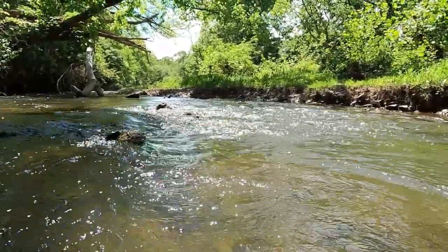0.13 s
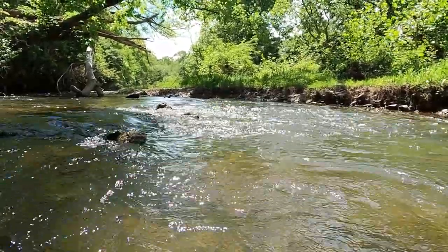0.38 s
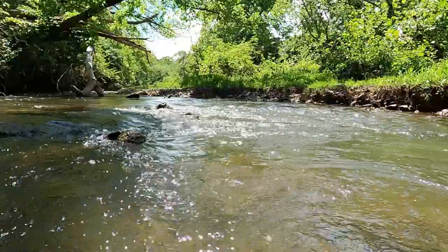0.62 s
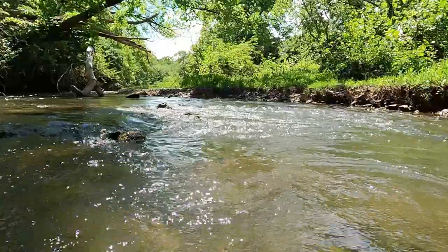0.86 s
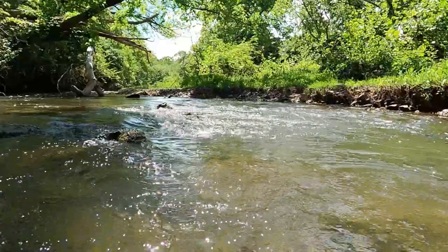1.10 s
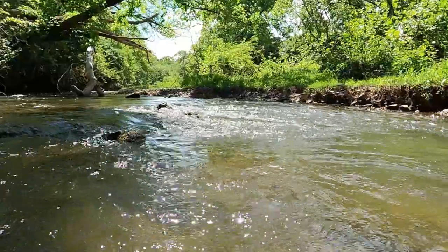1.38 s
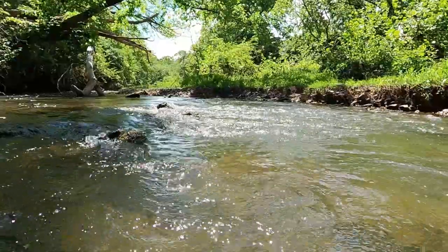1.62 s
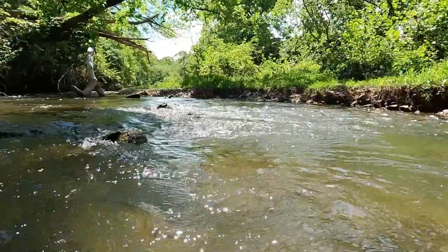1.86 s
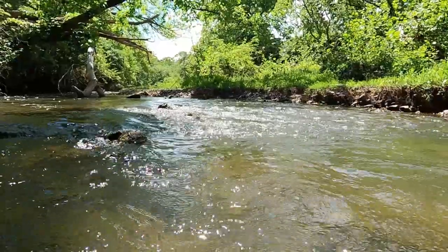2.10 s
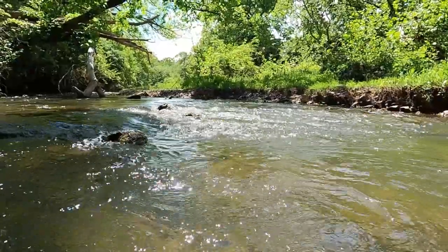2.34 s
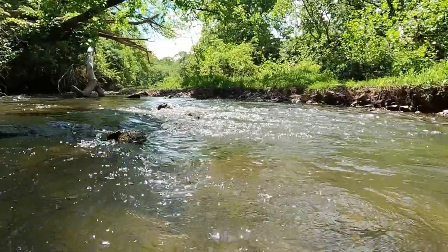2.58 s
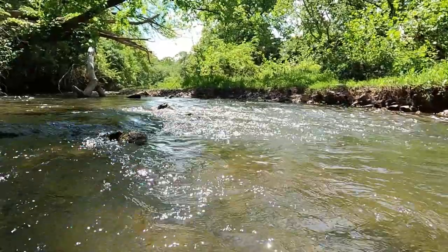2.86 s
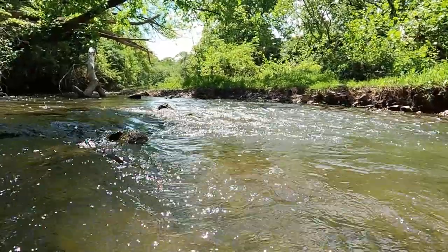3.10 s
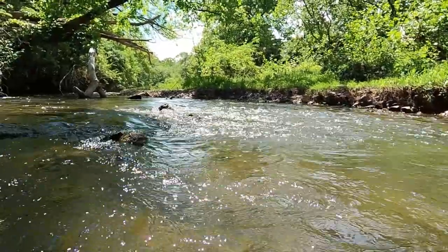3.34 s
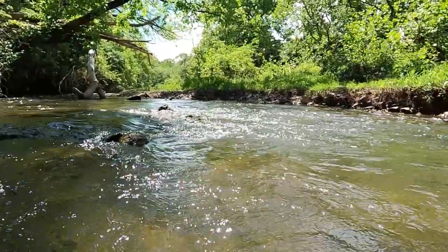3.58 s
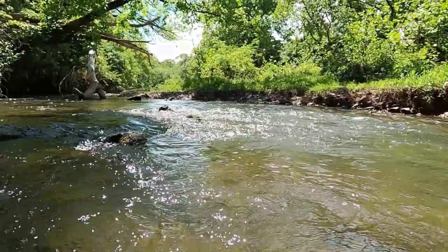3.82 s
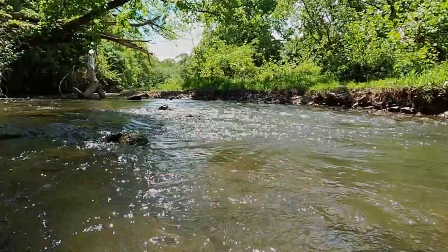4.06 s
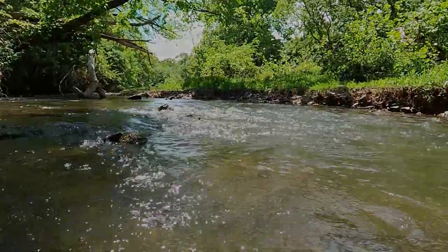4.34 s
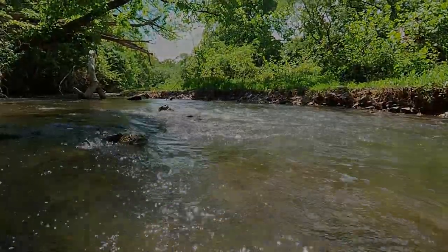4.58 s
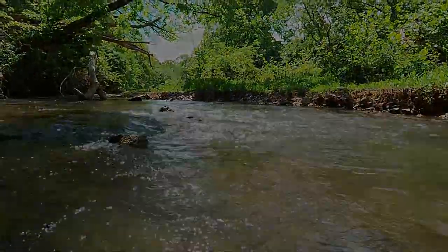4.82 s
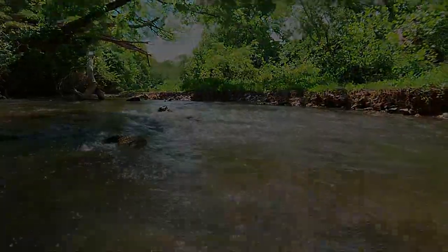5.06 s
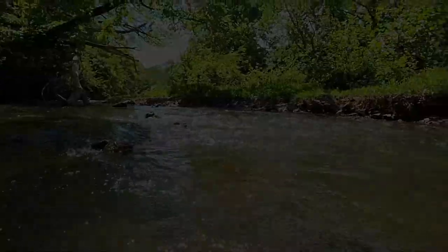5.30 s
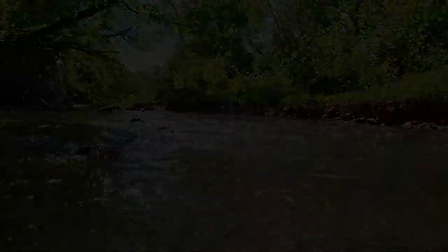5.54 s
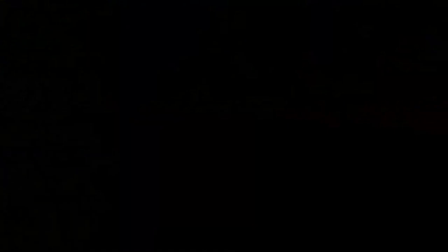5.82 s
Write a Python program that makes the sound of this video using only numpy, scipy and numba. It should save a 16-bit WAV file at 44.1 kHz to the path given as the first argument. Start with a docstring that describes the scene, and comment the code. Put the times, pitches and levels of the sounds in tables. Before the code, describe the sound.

A shallow creek babbles over stones from the start, a dense crowd of short bubble tones with distinct plops and fine spray ticks. A gurgle comes early, a low engine-like drone slides upward around one second, and a faint hum follows. Soft water hiss, rumble and light breeze lie beneath. A small stereo microphone sits outdoors a few metres away, just above the water. The sound fades from about four seconds, then cuts off.

```python
"""Water babbling over stones comes first: a crowd of short bubble tones with single plops and gurgles on top.
Each bubble in this shallow creek is a sine grain that swells and dies in a few cycles; spray is treble ticks,
and farther water is a hiss of coloured noise. Below lie a noise rumble, a sliding sine drone, a faint hum of
three partials and breeze in low noise puffs. A small two-port microphone hears it a few metres from the stones,
just above the water. The sound is faded down and cut off at the end."""
import sys
import numpy as np
from scipy import signal
from scipy.fft import rfft, irfft
from scipy.io import wavfile
from scipy.ndimage import uniform_filter1d
from numba import njit

SR = 44100
rng = np.random.default_rng(int(sys.argv[2]) if len(sys.argv) > 2 else 0)


def gain_from_db(level_db):
    """Convert decibel levels to linear amplitude factors (20 dB per decade)."""
    decades = np.asarray(level_db, float) / 20
    return 10 ** decades


def transcribe(signal):
    """Save signal, clipped to [-1, 1], as a 16-bit WAV file at the path in sys.argv[1]."""
    frames = np.atleast_2d(signal).T
    limited = np.clip(frames, -1, 1)
    pcm = np.round(limited * 32767).astype(np.int16)
    wavfile.write(sys.argv[1], SR, pcm)


N = 261072
CUT_S = 5.496  # the water events and the sound end here

# nearest bubbles, before housing and fade: loudest moment t/s, pitch f/Hz, peak level/dB, half-height length/cycles
CLEAR_BUBBLES = [(0.2302, 3340, -32, 12.1), (0.2474, 7190, -34.5, 4.3), (2.945, 540, -30, 4),
                 (3.014, 570, -30, 6), (2.91, 1800, -29, 6), (4.453, 1310, -36, 10), (4.473, 1330, -40, 9),
                 (4.622, 1340, -31, 9), (0.4846, 2810, -29, 6.2), (0.55, 1310, -29.5, 10.6),
                 (0.774, 4600, -34.5, 4.2), (0.789, 1590, -26.5, 4.2), (0.833, 357, -31, 6),
                 (0.849, 2050, -34.5, 14), (0.8597, 2790, -30, 6.5), (1.0695, 4550, -29.5, 3.7),
                 (1.063, 3340, -31.5, 6), (1.276, 1950, -29.5, 5), (1.1808, 3120, -27.5, 5.2),
                 (1.2253, 5550, -30.5, 2.9), (1.281, 2800, -25, 2.2), (1.305, 860, -27.5, 5.0),
                 (1.5542, 600, -27.5, 5.3), (1.6294, 570, -30, 7.0), (1.6344, 3080, -26, 4.1),
                 (1.7863, 2600, -27.5, 4.4), (1.8148, 1380, -23.5, 4.5), (1.9855, 2160, -25.5, 4.9),
                 (2.048, 455, -29, 8.5), (2.1422, 3350, -34.5, 27), (2.1527, 2540, -25, 5.1),
                 (2.1944, 4080, -32.5, 7.9), (2.2385, 1273, -24.5, 17), (2.2971, 2300, -25.5, 5.2),
                 (2.392, 820, -31, 9.0), (2.4038, 2170, -23.5, 3.1), (2.5762, 2600, -30, 7.5),
                 (2.6912, 3370, -27, 5.1), (2.9183, 840, -24, 4), (3.0115, 720, -25, 4.6),
                 (3.012, 2360, -21.5, 2.1), (3.0388, 3180, -28, 2.8), (3.0392, 2450, -23.5, 5.6),
                 (3.0806, 3470, -32, 6.3), (3.1305, 5950, -34.5, 7.3), (3.1474, 1320, -26.5, 5.8),
                 (3.1839, 3030, -22, 4.3), (3.2295, 2320, -24, 3.1), (3.4136, 746, -27, 7),
                 (3.6854, 2560, -30, 7.6), (3.805, 1350, -31, 11.6), (3.8858, 2840, -29.5, 6.7),
                 (3.9386, 1210, -32.5, 5.9), (3.9664, 380, -32, 9.9), (4.097, 1930, -30, 12),
                 (4.083, 1700, -31.5, 9), (4.097, 900, -28, 4.5), (4.1125, 1990, -27, 7.2),
                 (4.3043, 3590, -34.5, 10), (4.319, 6090, -35, 5.5), (4.423, 430, -27.5, 4.4),
                 (4.5362, 3290, -31, 4.9), (4.6374, 980, -27.5, 8.8), (5.0065, 2990, -27, 2.7),
                 (5.2092, 2350, -22.5, 5.7), (0.1474, 2490, -36, 12), (0.1689, 4440, -38, 8),
                 (0.2582, 2490, -30, 7), (0.2751, 740, -28.5, 4.5), (0.6218, 3960, -35, 5),
                 (0.6453, 1180, -33, 11), (0.6947, 4440, -39, 6), (0.7363, 660, -31, 5),
                 (0.8344, 1320, -31.5, 5), (0.8408, 620, -37, 5), (0.9321, 6900, -38.5, 6),
                 (1.0384, 1400, -30, 6), (1.0788, 900, -34, 12), (1.311, 1050, -26, 5.5),
                 (1.58, 600, -31, 9), (1.605, 640, -41, 7), (1.6592, 2300, -31.5, 6), (1.801, 1980, -27, 5),
                 (1.869, 5500, -34, 4.5), (2.0286, 930, -30, 8.5), (2.1633, 3740, -33, 6),
                 (2.4367, 2350, -26.5, 4.5), (2.4751, 3530, -36.5, 11), (2.502, 1870, -31, 4.5),
                 (2.5526, 4200, -36, 5.5), (2.7737, 5800, -38, 7), (2.9004, 1400, -29, 6),
                 (2.9383, 3530, -36, 7.5), (3.1638, 1700, -29.5, 5.5), (3.255, 990, -32, 5),
                 (3.4827, 5100, -35, 6), (3.512, 6900, -42, 6), (3.5512, 880, -35, 5),
                 (3.8475, 5200, -37.5, 8.5), (3.9253, 6660, -39, 6), (3.9292, 1250, -25.5, 5.5),
                 (3.9393, 2220, -33, 10), (4.0835, 2220, -37, 6), (4.1156, 2800, -29.5, 9),
                 (4.4025, 1700, -31, 5), (4.412, 559.1, -33, 5), (4.5495, 930, -34, 16),
                 (4.6898, 2150, -29, 9), (4.8056, 2700, -32, 10), (4.844, 3400, -33, 6),
                 (4.8759, 2220, -27, 4.5), (4.9201, 4440, -38, 9), (5.0066, 1900, -31, 11),
                 (5.0203, 440, -30, 6.5), (5.1493, 1200, -33, 5.5), (5.1757, 2220, -30, 8),
                 (5.1875, 1300, -29, 5.5), (3.4383, 1110, -31, 6), (3.4716, 2010, -32, 6),
                 (3.526, 614, -34.5, 5), (3.5375, 700, -30.5, 5), (3.5405, 1250, -36, 6),
                 (3.5619, 640, -29, 6), (0.753, 1180, -31, 6), (1.009, 580, -31, 8), (1.026, 2230, -30, 6),
                 (1.092, 596, -43, 5), (2.815, 980, -32.5, 7), (2.834, 3600, -39, 8),
                 (3.38, 2700, -33, 5.5), (3.4068, 3960, -34, 5), (3.474, 610, -28, 3.6),
                 (3.574, 1550, -31.5, 8), (3.6444, 4580, -37.5, 7.4), (4.254, 5350, -42, 9),
                 (1.1731, 5290, -36, 6.5), (3.257, 4440, -40, 8)]
# larger pockets, before housing and fade: loudest moment t/s, pitch f/Hz, peak level/dB, half-height length/cycles,
# pitch rise over that length/fraction
GURGLE_POCKETS = [(0.416, 630, -31.5, 9, 0.3), (0.422, 1210, -39, 10, .1), (0.45, 620, -29.5, 7, .2),
                  (0.455, 1080, -27, 11, 0.23), (0.468, 770, -31.5, 12, 0), (0.469, 1230, -32, 12, 0.2),
                  (2.983, 442, -36, 9, .2), (2.99, 740, -35, 13, 0.02), (2.998, 1290, -32.5, 18, 0.06),
                  (3.041, 1340, -34, 25, 0), (4.183, 614, -34.5, 16, 0)]
# nearest droplets: a millisecond before the loudest moment t/s, base level/dB for the tick's tones
SPRAY_TICKS = [(0.172, -45), (0.2468, -47), (0.7497, -44), (0.841, -41), (1.2007, -46), (1.3328, -39.5),
               (1.387, -40.5), (1.4384, -35), (3.2445, -43), (3.7429, -42.5), (4.342, -43), (4.646, -39),
               (0.8074, -46), (1.2237, -49), (1.2471, -49.5), (1.2933, -45), (1.4459, -50.5), (2.7463, -45),
               (3.2178, -45), (3.4042, -45), (4.3088, -45), (4.479, -47.5), (4.9495, -44), (1.62, -49),
               (1.7175, -52.5), (1.803, -46.5), (1.846, -50), (2.033, -48), (5.3184, -46), (5.3428, -42)]
# tones inside one tick: f/Hz, added level/dB, half-height length/cycles
TICK_TONES = [(7000, 1.5, 2.5), (10500, -1, 3.0), (13000, -14.5, 4.0)]
# spectral shape of the water, relative per Hz: f/Hz, level/dB
WATER_COLOUR = [(150, -26), (250, -5), (418, -5), (568, -1.5), (735, -1.5), (843, -2), (1290, -2.5),
                (1510, -5), (2200, -6), (3490, -16.5), (5080, -20.5), (7530, -27), (8340, -31),
                (12200, -43.5), (14900, -54)]
# spectral shape of the outdoor rumble, relative per Hz: f/Hz, level/dB
RUMBLE_COLOUR = [(8.8, -34.5), (15, -9), (24, 7.5), (40, 1), (62, 2), (76, -2), (90, -5.5), (113, -5),
                 (212, -7), (252, -15), (350, -23), (460, -38), (770, -120)]
# surges of the current: t/s, added level/dB
CURRENT_SURGES = [(0, 1.5), (.3, 2), (.62, 0.5), (.8, 4.5), (.95, 1), (1.08, 2), (1.25, 0.5), (1.7, 1),
                  (1.95, 1), (2.2, 2), (2.6, 1.5), (3, 2), (3.3, 1.5), (3.55, 1.5), (3.75, 2.5), (3.9, 2),
                  (4.02, 1.5), (4.11, 2.5), (4.25, 0.5), (4.45, 1), (4.6, 3), (4.8, 2), (5.05, 3.5),
                  (5.5, 5)]
# swells of the rumble: t/s, added level/dB
RUMBLE_SWELLS = [(0, -2), (.25, -3), (.45, -0.5), (.85, -1.5), (1.05, 0.5), (1.4, -2), (1.6, -1.5),
                 (2, -2.5), (2.4, -1.5), (2.9, -1.5), (3.2, 0), (3.6, -2), (4, -3.5), (4.3, 2), (4.7, -0.5),
                 (4.9, 1.5), (5.5, 1)]
# partials of the hum before wavering: f/Hz, relative level/dB
HUM_TONES = [(88.5, -1), (133, -5), (176, -8.5)]
# how the two ports differ: f/Hz, left minus right level/dB, lag of left/rad, unrelated share/0-1
PORT_DIFFERENCES = [(40, .6, 0, .06), (250, .2, .08, .07), (500, 1, .31, .11), (800, -.7, .73, .19),
                    (1000, -3.4, .58, .31), (1300, -1.9, .08, .23), (1600, -.3, .06, .23),
                    (2000, 2.3, .32, .27), (2600, 2.1, .71, .24), (3300, .6, .67, .27),
                    (5100, .5, .33, .42), (6500, 1.8, .11, .48), (8100, 3.8, .31, .55), (10000, 0, 0, .35),
                    (13000, -.3, 0, .65)]
# colour of the microphone in its housing: f/Hz, level/dB
HOUSING_COLOUR = [(2500, 0), (3000, 1.5), (3450, 3.5), (3750, 2.5), (4450, 2), (5000, -1), (6500, -0.5),
                  (7300, 2.5), (7850, 2.5), (8050, -2), (9000, 0.5), (12400, 0), (12800, 3), (13300, -1),
                  (14300, -4.5)]


def curve(table, column=1):
    """Reads a table column at every sample, on straight lines through time."""
    rows = np.array(table, float)
    return np.interp(np.arange(N) / SR, rows[:, 0], rows[:, column])


def at(table, hz, column=1):
    """Reads a table column on a log-frequency axis."""
    rows = np.array(table, float)
    return np.interp(np.log(hz + 1), np.log(rows[:, 0] + 1), rows[:, column])


def level(x, db):
    """Scales to an rms level in dB."""
    return x * gain_from_db(db) / np.sqrt(np.mean(x ** 2))


def walk(rate_hz):
    """Random levels held 1 / rate_hz seconds and slewed twice; spread 1."""
    hold = int(SR / rate_hz)
    steps = np.repeat(rng.standard_normal(N // hold + 1), hold)
    smooth = uniform_filter1d(uniform_filter1d(steps, hold), hold)[:N]
    return smooth / smooth.std()


def gate(from_s, to_s, edge_s):
    """Rises, holds and falls, with equal straight edges."""
    t = np.arange(N) / SR
    return np.clip(np.minimum(t - from_s, to_s - t) / edge_s, 0, 1)


def ports(hz):
    """Level difference, lag and unrelated share of the two ports, each set by pitch."""
    return (at(PORT_DIFFERENCES, hz, column=k) for k in (1, 2, 3))


def wash(spectrum):
    """Coloured noise at both ports, partly shared, at 0 dB rms."""
    hz = np.fft.rfftfreq(N, 1 / SR)
    mid, other = rfft(rng.standard_normal((2, N)))
    pan_db, lag, share = ports(hz)
    side = gain_from_db(pan_db / 2) * np.exp(-.5j * lag)
    pair = np.array([(mid + share * other) * side, (mid - share * other) / side])
    return level(irfft(gain_from_db(at(spectrum, hz)) * pair, N), 0)


@njit
def ring(peak, turn, tau, glide, left, right):
    """Each grain swells and dies as u^2 exp(-u), loudest at u = 2, while its pitch glides."""
    out = np.zeros((2, N))
    for k in range(len(peak)):
        start = int(peak[k] - 2 * tau[k])
        fall = np.exp(-1 / tau[k])
        z = 1 + 0j
        step = fall * np.exp(1j * turn[k] * (1 - 2 * glide[k]))
        bend = np.exp(1j * turn[k] * glide[k] / tau[k])
        for i in range(int(11 * tau[k])):
            z, step = z * step, step * bend
            if 0 <= start + i < N:
                swell = (i / tau[k]) ** 2
                out[0, start + i] += swell * (z * left[k]).real
                out[1, start + i] += swell * (z * right[k]).real
    return out


def bubbles(s, hz, db, cycles, pan_db, lag, glide):
    """Short tones; cycles is the width at half height, glide the fractional pitch rise over it."""
    widths = 3.4  # half-height width of u^2 exp(-u)
    phase = np.exp(2j * np.pi * rng.random(len(s)))
    size = gain_from_db(db) * np.exp(2) / 4 * phase  # the grain's own peak is 4 exp(-2)
    side = gain_from_db(pan_db / 2) * np.exp(-.5j * lag)
    turn, tau = 2 * np.pi * hz / SR, cycles / widths * SR / hz
    return ring(s * SR, turn, tau, glide / widths, size * side, size / side)


def breeze():
    """Light air buffets each port on its own: low noise in puffs, mostly between 15 and 55 Hz."""
    low = signal.butter(3, 55, fs=SR, output="sos")
    high = signal.butter(2, 15, "high", fs=SR, output="sos")
    puff_db = 4 * np.array([walk(11.0), walk(3.3)])
    puffs = signal.sosfilt(low, rng.standard_normal((2, N))) * gain_from_db(puff_db)
    return level(signal.sosfilt(high, puffs), -53.5)


def rumble():
    """Low outdoor noise that swells apart from the water, wavering a little."""
    loud_db = -34.0 + curve(RUMBLE_SWELLS) + 0.47 * walk(7.3)
    return gain_from_db(loud_db) * wash(RUMBLE_COLOUR)


def hum():
    """Partials of a distant motor running level, wavering together in pitch and apart in level."""
    from_s, to_s, edge_s = 1.45, 3.93, 0.032
    base_db, waver_db = -44.5, 4.3
    waver = 1 + 0.012 * walk(7)
    tones = 0
    for hz, db in HUM_TONES:
        tone = np.sin(2 * np.pi * np.cumsum(hz * waver) / SR)
        tones = tones + gain_from_db(db + waver_db * walk(6.6)) * tone
    return np.sqrt(2) * gain_from_db(base_db) * gate(from_s, to_s, edge_s) * tones


def drone():
    """A low sine slides up and grows, fluttering a little, then stops, like a far engine gathering speed."""
    from_s, to_s, edge_s = .9, 1.5, .1
    start_hz, rise_hz_per_s = 37.5, 52
    start_db, grow_db_per_s = -35, 3  # rms, before flutter and edges
    since_s = np.arange(N) / SR - from_s
    hz = start_hz + rise_hz_per_s * since_s + .6 * walk(12)
    loud_db = start_db + grow_db_per_s * since_s + .8 * walk(15)
    loud = gain_from_db(loud_db) * gate(from_s, to_s, edge_s)
    return np.sqrt(2) * loud * np.sin(2 * np.pi * np.cumsum(hz) / SR)


def far_water():
    """Farther water blurs to a hiss: water-coloured noise with a slight flicker in level."""
    return gain_from_db(-41.5 + .9 * walk(20)) * wash(WATER_COLOUR)


def spray(count, faint_db, scatter_db):
    """Droplets bursting: few-cycle treble tones that peak together, some placed and many faint at random."""
    s, db = np.array(SPRAY_TICKS, float).T
    u = rng.random((count, 2)).T
    s = np.append(s, u[0] * CUT_S)
    db = np.append(db, faint_db + scatter_db * u[1])
    one, rise_s = np.ones(len(s)), .001
    pan_db = 5.5  # left minus right
    ticks = 0
    for hz, part_db, cycles in TICK_TONES:
        ticks = ticks + bubbles(s + rise_s, hz * one, db + part_db, cycles * one, pan_db * one, 0 * one, 0 * one)
    return ticks


def riffle(count, scatter_db, cap_db, clump_db, cycles, glide, db):
    """A crowd of bubbles of all sizes, small ones more often; pockets of air break up in clumps."""
    u, g = rng.random((count, 3)).T, rng.standard_normal((count, 4)).T
    small = .67  # under 1 favours small, high bubbles
    s, hz = u[0] * CUT_S, 230 * gain_from_db(36 * u[1] ** small)
    quick = walk(40)
    # slower surges belong to the current
    clump = (quick - uniform_filter1d(quick, int(.12 * SR)))[(s * SR).astype(int)]
    # small bubbles ring for more cycles
    length = cycles * (hz / 1000) ** .25 * gain_from_db(3 * g[0])
    # most are faint, a few are near; none is nearer than the closest stones
    cap_db = cap_db / (1 + (hz / 9500) ** 2)  # the smallest bubbles never stand out
    near_db = cap_db * np.tanh((clump_db * clump - scatter_db * np.log(u[2])) / cap_db)
    # the uneven spread of sizes is balanced so that the crowd keeps the water's colour
    crowding_db = 10 * (1 / small - 1) * np.log10(u[1] + 0.022)
    colour_db = at(WATER_COLOUR, hz) + 20 * np.log10(hz / 1000)
    size_db = colour_db - 10 * np.log10(length) - crowding_db + near_db
    # each bubble has its own place across the stream
    pan_db, lag, share = ports(hz)
    pan_db, lag = pan_db + 11 * share * g[1], lag + 1.5 * share * g[2]
    return level(bubbles(s, hz, size_db, length, pan_db, lag, glide * (1 + g[3])), db)


def gurgles():
    """Larger pockets in mid-riffle ring longer; most rise in pitch as they near the surface."""
    s, hz, db, cycles, rise = np.array(GURGLE_POCKETS, float).T
    pan_db, lag, _ = ports(hz)
    return bubbles(s, hz, db, cycles, pan_db, lag, rise)


def clear_bubbles():
    """The nearest bubbles stand out singly from the middle of the riffle, each rising slightly in pitch."""
    s, hz, db, cycles = np.array(CLEAR_BUBBLES, float).T
    pan_db, lag, _ = ports(hz)
    return bubbles(s, hz, db, cycles, pan_db, lag, np.full(len(s), .04))


def scene():
    """The bubble crowd and far hiss surge with the current; all other layers keep their own levels."""
    background = breeze() + rumble() + hum() + drone()
    crowd = riffle(count=15000, scatter_db=4.5, cap_db=11.5, clump_db=3.1, cycles=7, glide=0.035, db=-38)
    stream = gain_from_db(curve(CURRENT_SURGES)) * (far_water() + crowd)
    droplets = spray(count=250, faint_db=-58.5, scatter_db=5)
    return background + stream + droplets + gurgles() + clear_bubbles()


def top_cut(x):
    """Nothing passes above the cut-off."""
    return signal.sosfilt(signal.butter(12, 15080, fs=SR, output="sos"), x)


def record(dry):
    """The housing colours the treble; then a straight fade and a cut within a millisecond."""
    fade_from_s, fade_zero_s, cut_edge_s = 3.886, 5.66, 0.00081  # the cut comes before the fade reaches zero
    housing = gain_from_db(at(HOUSING_COLOUR, np.fft.rfftfreq(N, 1 / SR)))
    coloured = irfft(housing * rfft(dry), N)
    t = np.arange(N) / SR
    fade = np.clip((fade_zero_s - t) / (fade_zero_s - fade_from_s), 0, 1)
    cut = np.clip((CUT_S - t) / cut_edge_s, 0, 1)
    return top_cut(coloured * fade * cut)


dry = scene()
out = record(dry)
transcribe(out)
```